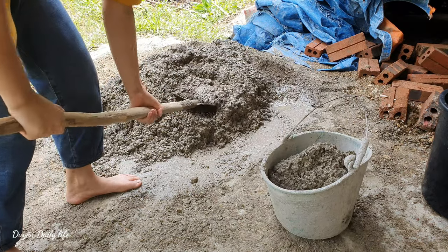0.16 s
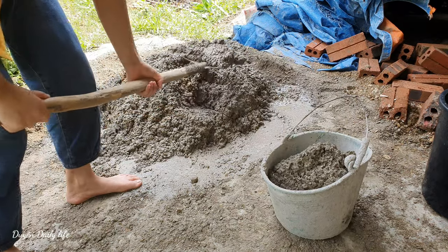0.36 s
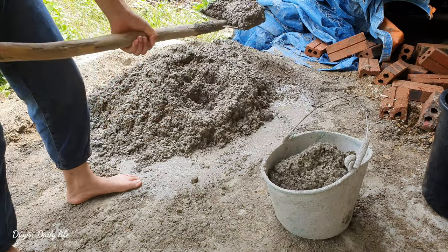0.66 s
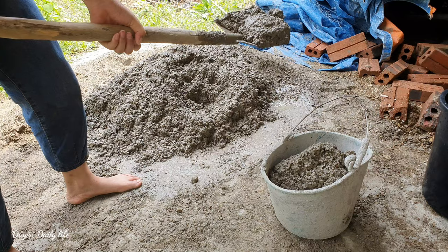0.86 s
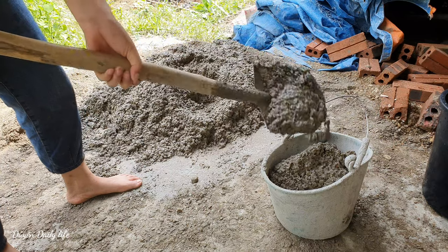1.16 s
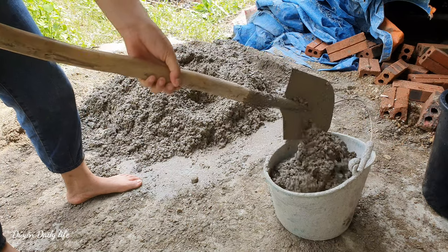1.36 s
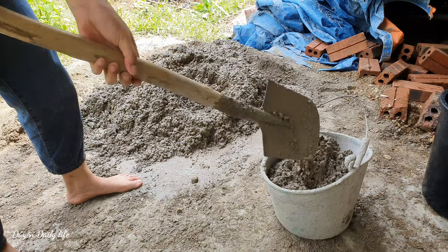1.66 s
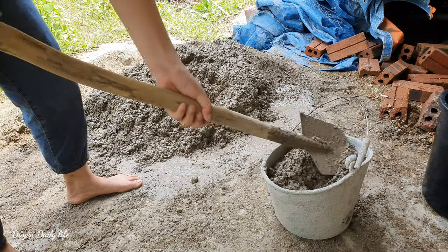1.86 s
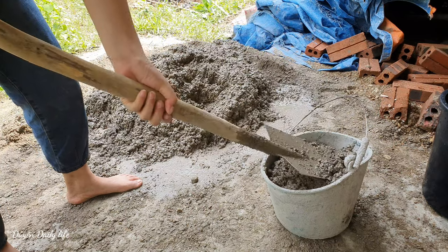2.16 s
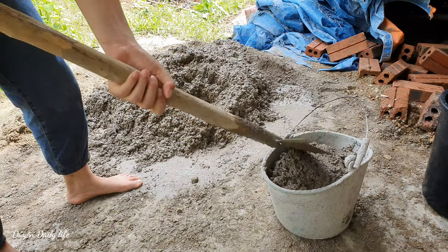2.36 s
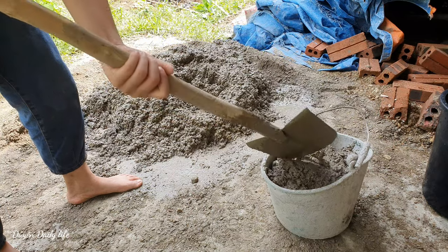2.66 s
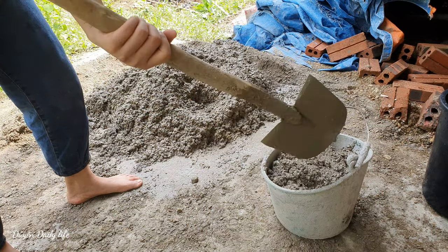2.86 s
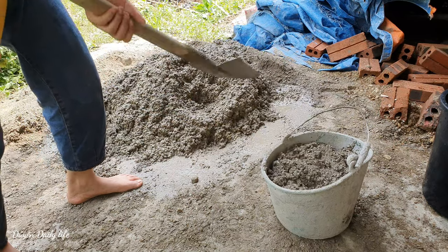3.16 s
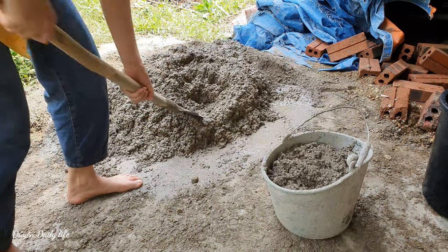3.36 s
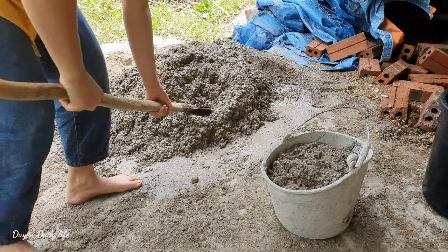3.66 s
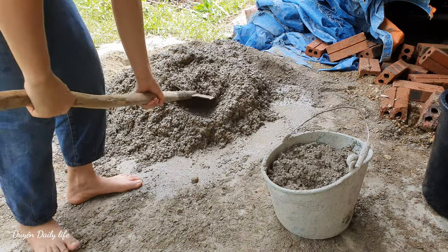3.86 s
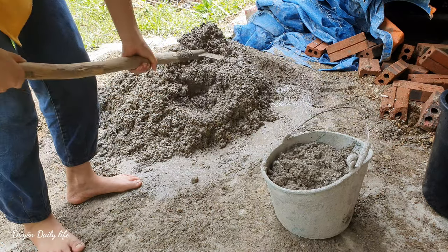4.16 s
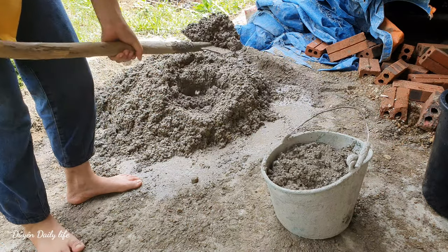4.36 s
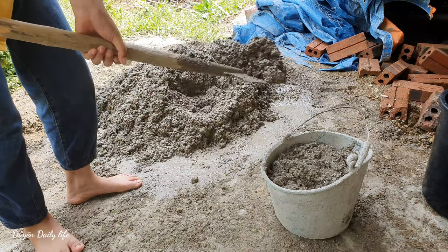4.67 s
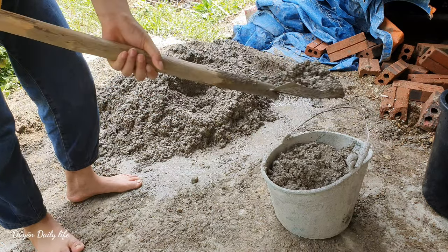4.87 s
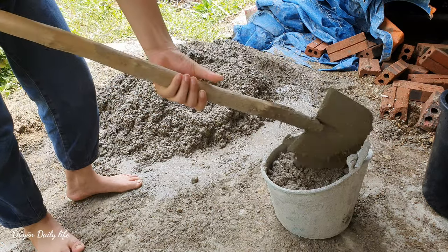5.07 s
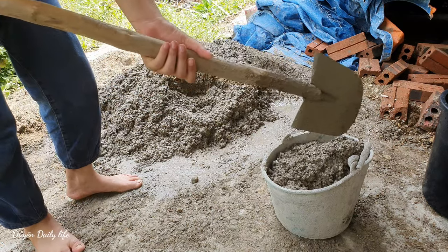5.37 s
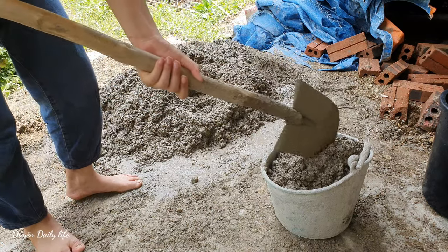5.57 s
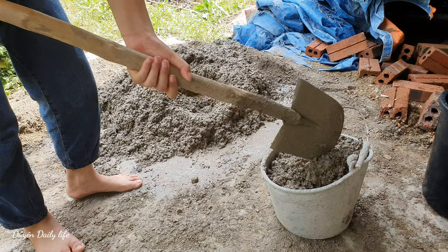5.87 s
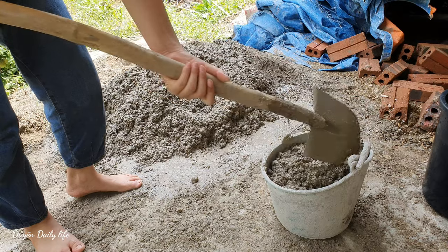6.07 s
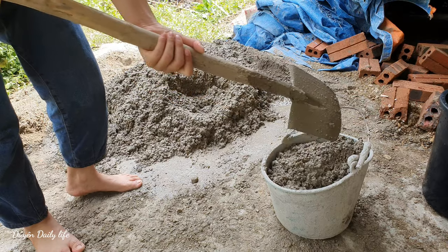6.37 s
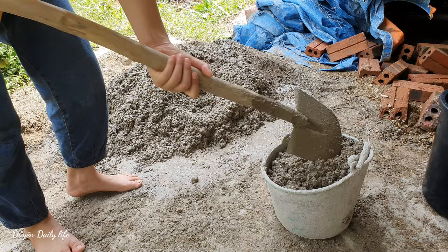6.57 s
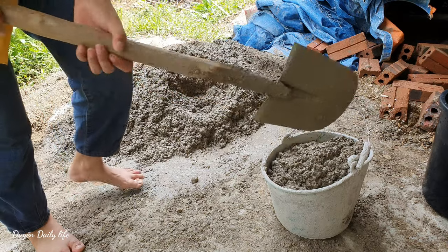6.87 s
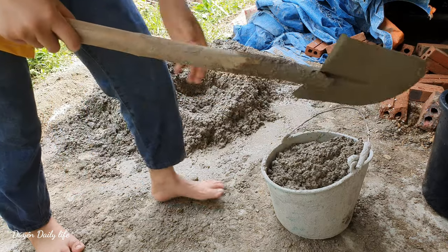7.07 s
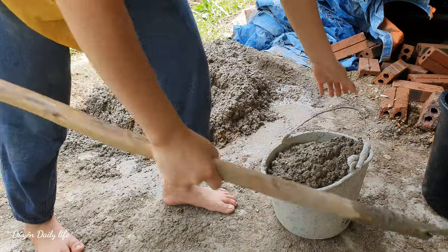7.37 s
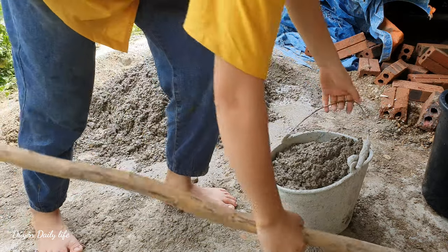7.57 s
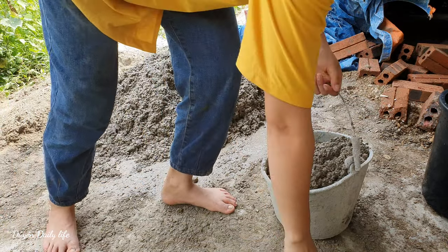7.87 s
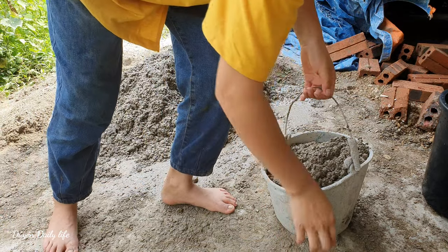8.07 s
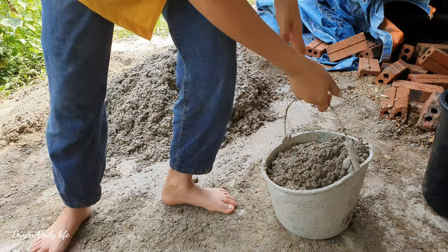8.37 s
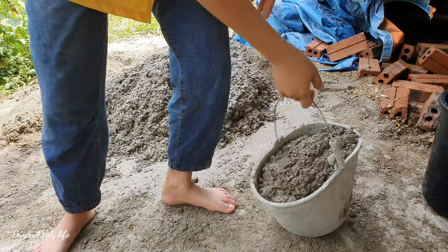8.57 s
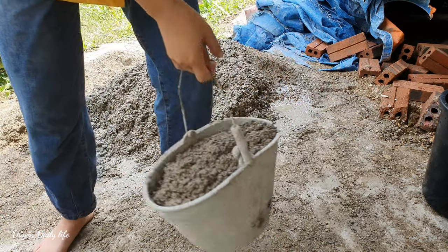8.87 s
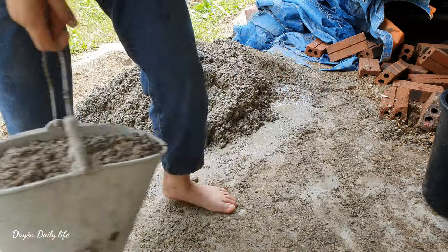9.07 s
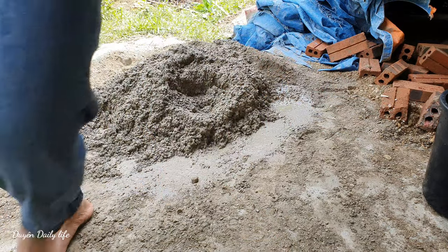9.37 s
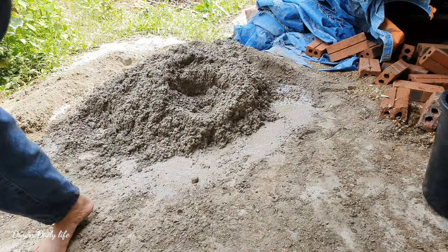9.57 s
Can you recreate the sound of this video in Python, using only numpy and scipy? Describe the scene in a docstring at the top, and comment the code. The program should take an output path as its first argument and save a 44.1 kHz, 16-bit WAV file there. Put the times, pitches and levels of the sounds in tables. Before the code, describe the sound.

A shovel scrapes gritty wet mortar into a plastic bucket, then clangs on the ground, with a faint cicada buzzing behind.

```python
"""Shovelling mortar outdoors.

Close to a stereo microphone, a steel shovel digs damp mortar from a heap, tips and pats it into a
plastic bucket and is dropped on the ground. Grit rubs along the blade, lumps knock and thud, the bare
blade clangs. Farther off, one cicada throbs over a distant chorus, leaves hiss and a far motor hums."""
import sys
import numpy as np
from scipy import signal
from scipy.fft import rfft, irfft
from scipy.io import wavfile
from scipy.ndimage import map_coordinates

SR = 44100
rng = np.random.default_rng(int(sys.argv[2]) if len(sys.argv) > 2 else 0)


def file_out(sig):
    """Save sig as 16-bit WAV at sys.argv[1]."""
    # one column per channel
    cols = np.atleast_2d(sig).T
    # limit, then scale
    lim = np.clip(cols, -1, 1)
    pcm = np.round(lim * 32767).astype(np.int16)
    wavfile.write(sys.argv[1], SR, pcm)


N = 429092

# how alike the microphone's two sides are: f/Hz, likeness/0..1
LEFT_RIGHT_LIKENESS = [(100, 0.96), (400, 0.87), (1000, 0.54), (2500, 0.19), (6000, 0.49), (15000, .1)]


def amp(db):
    return 10 ** (np.asarray(db) / 20)


def unit_rms(x):
    return x / np.sqrt(np.mean(x ** 2) + 1e-24)


def in_time(rows):
    """One curve per column after t/s, read at every sample."""
    times, *columns = np.transpose(rows)
    return [np.interp(np.arange(N) / SR, times, column) for column in columns]


def at_hz(points):
    """A spectrum table read at every FFT bin."""
    bin_hz = np.maximum(np.arange(N // 2 + 1) * SR / N, 1)
    hz, values = np.transpose(points)
    return np.interp(np.log(bin_hz), np.log(hz), values)


def colour(x, spectrum):
    """Filter by a spectrum table, then scale to unit RMS."""
    return unit_rms(irfft(rfft(x) * amp(at_hz(spectrum)), N))


def drift(rate_hz):
    """Slow random wander of unit RMS."""
    hop = 40
    pole = np.exp(-2 * np.pi * hop * rate_hz / SR)
    slow = signal.lfilter([1], [1, -2 * pole, pole * pole], rng.standard_normal(N // hop + 2002))[2000:]
    return np.interp(np.arange(N) / hop, np.arange(len(slow)), unit_rms(slow))


def resonate(x, hz, width_hz):
    """One resonance with unit gain at its peak."""
    r = np.exp(-np.pi * width_hz / SR)
    feedback = [1, -2 * r * np.cos(2 * np.pi * hz / SR), r * r]
    return signal.lfilter([(1 - r * r) / 2, 0, (r * r - 1) / 2], feedback, x)


def grains(per_s, spread_db, clump_db):
    """Uneven clicks in clumps; mid and side fire at the same moments."""
    size = amp(spread_db * np.minimum(rng.exponential(1, N), 4) + clump_db * drift(23))
    return size * (rng.random(N) < per_s / SR) * rng.standard_normal((2, N))


def burst(t60, rise_s, samples):
    """Mid and side noise under one quick rise and decay."""
    t = np.arange(samples) / SR
    return rng.standard_normal((2, samples)) * amp(-60 * t / max(t60, .004)) * np.minimum(t / rise_s, 1)


def add(out, start, sound, peak_db):
    """Mix in a sound with its mid part peaking at peak_db."""
    i = round(start * SR)
    part = sound[:, :N - i]
    out[:, i:i + part.shape[1]] += amp(peak_db) * part / np.abs(sound[0]).max()


def stereo(mid_side, likeness):
    """Mid and side become left and right, as alike as asked at each frequency."""
    alike = np.clip(likeness, 0, 1)
    mid, side = irfft(rfft(mid_side) * np.sqrt([(1 + alike) / 2, (1 - alike) / 2]), N) * np.sqrt(2)
    return np.array([mid + side, mid - side])


def open_air():
    """Distant rumble and leaf hiss all around the microphone."""
    # background spectrum: f/Hz, relative level/dB
    spectrum = [(25, -41), (60, -4.5), (120, -3), (260, -6.5), (450, -11.5), (1500, -18.5), (3200, -18.5),
                (5000, -6), (6500, -19), (11000, -21.5), (12500, -37.5), (15000, -44.5)]
    air = colour(rng.standard_normal((2, N)), spectrum)
    return stereo(air, at_hz(LEFT_RIGHT_LIKENESS) ** 3.3) * amp(-71 + drift(0.5))


def far_motor():
    """A wavering hum, far off and a little to the right."""
    hz = 199 + 2.73 * drift(3.7)
    hum = np.sin(2 * np.pi * np.cumsum(hz) / SR) * amp(-75.5 + 2.4 * drift(2.0))
    return hum * amp([[-1.4], [1.4]])


def cicadas():
    """One insect, left of centre, beats about twelve pulses a throb; the far chorus blurs into bands."""
    # swell of the insects: t/s, near level/dB, chorus level/dB
    swell = [(0, -69, -66.5), (2, -63.5, -62.5), (4, -68, -68), (6, -63.5, -63.5), (8, -67, -66.5),
             (8.6, -72, -72.5), (9.1, -70, -71), (9.73, -63, -60.5)]
    # pace of the near cicada: t/s, throbs completed
    throb_count = [(0, .58), (1.1, 9.885), (3.55, 30.52), (3.85, 32.75), (5.0, 42.54), (6.5, 55.31),
                   (7.2, 61.22), (8.0, 67.84), (9.0, 76.23), (9.73, 82.42)]
    # its resonances: f/Hz, width/Hz, relative level/dB
    near_bands = [(5523, 160, 1), (5315, 97, -4.5), (5410, 140, -11)]
    # bands of the far chorus: f/Hz, width/Hz, relative level/dB
    chorus_bands = [(4221, 100, 8), (4740, 65, 1.5), (4900, 86, 0), (7660, 300, -8.5), (11000, 900, -19.5)]
    pulses_per_s = 101.6
    near_db, chorus_db = in_time(swell)
    throb = np.clip(.9 + np.cos(2 * np.pi * in_time(throb_count)[0]), .3, 1)
    pulse_phase = (np.arange(N) * pulses_per_s / SR + 0.087 * drift(0.74)) % 1
    buzz = rng.standard_normal((2, N)) * (np.exp(-4.5 * pulse_phase) + 0.28) * throb
    near = sum(amp(db) * resonate(resonate(buzz, hz, width), hz, 3 * width)
               for hz, width, db in near_bands)
    haze = rng.standard_normal((2, N))
    chorus = sum(amp(db + 0.58 * drift(19)) * resonate(resonate(haze, hz, width), hz, 3 * width)
                 for hz, width, db in chorus_bands)
    return amp(near_db) * unit_rms(near) * amp([[1.4], [-1.4]]) + amp(chorus_db) * unit_rms(chorus)


def mortar_motion():
    """Trickle, strokes and thrown grit set the gains of crunch, grit, sand and four broad rings."""
    # loose mortar trickling and feet rustling between strokes: t/s, grit level/dB, sand level/dB
    trickle = [(0, -79, -76), (.66, -73.5, -69), (.85, -89.5, -79), (1.2, -83, -76.5), (1.8, -68, -74),
               (2.85, -83, -73), (3.0, -76.5, -73.5), (3.33, -85.5, -72.5), (3.47, -87, -80),
               (4.4, -74, -69), (4.6, -79.5, -74), (4.93, -87, -82), (5.1, -72.5, -75), (6.1, -87, -84),
               (6.9, -75, -70.5), (7.05, -75, -68), (7.2, -91.5, -83), (7.64, -81, -77), (8.35, -75, -82),
               (8.6, -87, -95), (9.05, -83.5, -95), (9.4, -79.5, -77)]
    # blade strokes through mortar: t/s, rise/s, sag/s, swell/dB, sag/dB, then crunch, grit and sand
    # level/dB at the end of the rise, then hollow, low, middle and high ring gain/dB
    strokes = [(.13, 0.14, 0.28, 3.5, 15, -69.5, -68.5, -77, 14, -15, -13, -8),
               (.69, .1, 0.0045, 6.5, -1, -76.5, -66.5, -62.5, -15, -13, -14, -6),
               (1.291, .17, 0.098, 13.5, 11, -42.5, -44, -48.5, -17, -6, -5, -22),
               (1.58, 0.032, 0.16, 8, 9, -66, -73, -68, -7, 12, 11, -11),
               (1.84, .035, 0.15, 8.5, 1, -59, -51, -51, -20, 0, -1, -1),
               (1.9, .14, 0.0039, 9.5, -1.5, -47.5, -52, -59, 0, -9, -8, -10),
               (2.117, 0.04, 0.15, 5, 3.5, -57, -52, -53.5, -33, -9, -6, -15),
               (2.51, 0.042, 0.036, -2.5, -2.5, -63, -58, -60, -15, -6, -16, -7),
               (2.625, 0.099, 0.0062, 12.5, -1, -55.5, -48.5, -53.5, 10, 8.5, -2, -18),
               (3.49, 0.026, 0.068, 9.5, 7, -42, -37, -38.5, 8, 6.5, -17, -2),
               (3.79, 0.057, 0.13, 3.5, 3.5, -68.5, -63.5, -71.5, 14.5, -23, -4, -29),
               (4.0, 0.19, 0.23, 0.5, 19, -76.5, -69.5, -71, 1, -15, -12, -12),
               (5.149, 0.082, 0.041, 17, 8.5, -52.5, -50.5, -52, -19, 1, -5, -6),
               (5.27, 0.015, 0.077, 3, -2.5, -63.5, -60, -72, -14, -8, -2, -19),
               (5.675, 0.058, 0.053, 11.5, 2.5, -58, -49, -51, -9, 4.5, 3.5, -12),
               (5.84, 0.089, 0.099, 4.5, 9, -62, -57, -57.5, -6, 2.5, 9.5, 3),
               (6.168, 0.024, .18, 2, 1.5, -64.5, -55, -56, -17, 3.5, 3.5, 3.5),
               (6.581, .17, 0.032, 9.5, 4, -58.5, -49.5, -50.5, -15.5, 3.5, -5, -10),
               (7.78, 0.019, 0.11, 19, 6, -54.5, -59, -60.5, -13, 7, 15.5, -10),
               (7.98, 0.018, 0.014, 1, -3.5, -63.5, -62.5, -78, -7, -12, -7, -13),
               (8.155, 0.0033, 0.13, -5, 2.5, -67, -69.5, -79, 4, 12.5, -9, 5),
               (9.561, 0.017, .005, 5.5, 1, -54, -48.5, -53.5, -8.5, 2, -9, -1)]
    # grit thrown up by a blow: t/s, crunch, grit and sand level/dB, grit and sand fade/(dB/s)
    scatters = [(1.255, -56.5, -60, -64, 203), (2.43, -66.5, -62.5, -80, 350), (2.604, -42, -47, -64, 495),
                (3.243, -86.5, -71, -79, 171), (4.952, -69.5, -64, -53.5, 500), (7.247, -76, -62, -81, 298),
                (7.654, -43, -37, -48, 447), (7.72, -51, -34, -44, 554), (7.765, -58.5, -39, -49, 221),
                (8.52, -58, -60, -72, 501), (9.583, -43, -35.5, -70, 480), (9.63, -65, -58, -62, 112)]
    # ringing under trickling or thrown grit: hollow, low, middle and high ring gain/dB
    loose_rings_db = (-4.5, -4, -14.5, -9)
    bite_db_per_s, lift_db_per_s, settle_db_per_s, throw_db_per_s = 1197, 503, 172, 3000
    swing = np.array([[1.49], [1], [1]])   # the crunch swells and sags further than grit and sand
    fade_share = np.array([[0.6], [1], [1]])   # and lingers after a blow
    t = np.arange(0, N / SR, .001)
    sample_t = np.arange(N) / SR
    loose_rings = amp(loose_rings_db)[:, None]

    times, grit_db, sand_db = np.transpose(trickle)
    rustle_db = np.interp(t, times, grit_db) + 4 * np.interp(t, sample_t, drift(15))
    power = amp([rustle_db - 8, rustle_db, np.interp(t, times, sand_db)]) ** 2   # crunch, grit, sand
    rings = power[1] * loose_rings
    for start, rise, sag, swell_db, sag_db, *db in strokes:
        levels_db, rings_db = np.array(db[:3])[:, None], np.array(db[3:])[:, None]
        body_db = np.interp(t - start, [0, rise, rise + sag], [-swell_db, 0, -sag_db])
        bite_db = bite_db_per_s * np.maximum(start - t, 0)
        after = np.maximum(t - start - rise - sag, 0)
        # the blade lifts quickly, then the mortar settles slowly
        release_db = np.minimum(lift_db_per_s * after, 11.5 + settle_db_per_s * after)
        stroke = amp(levels_db + swing * body_db - bite_db - release_db) ** 2
        power += stroke
        rings += stroke[1] * amp(rings_db)
    for start, *db, fade_db_per_s in scatters:
        onset_db = throw_db_per_s * np.maximum(start - t, 0)
        fade_db = fade_db_per_s * np.maximum(t - start, 0) * fade_share
        scatter = amp(np.array(db)[:, None] - fade_db - onset_db) ** 2
        power += scatter
        rings += scatter[1] * loose_rings
    ring_gains = rings / power[1]   # each event counts by its share of the grit power
    return [np.interp(sample_t, t, gain) for gain in (*np.sqrt(power), *ring_gains)]


def pebbles(per_s, cycles):
    """Each stone click rings a few cycles at one of ten pitches."""
    clicks = grains(per_s, spread_db=2.5, clump_db=-1.5)
    pitch_index = rng.integers(0, 10, N)
    return sum(resonate(clicks * (pitch_index == k) + 1e-18, hz, 2.2 * hz / cycles)
               for k, hz in enumerate(np.geomspace(520, 1700, 10)))


def rubbing():
    """Stones crunch, grit scrapes, sand hisses; the blade rings along where the mortar lets it."""
    # spectra of stones, grit and sand on the blade: f/Hz, relative level/dB
    crunch_spectrum = [(50, -52.5), (120, -2), (380, -13), (520, 1), (800, 3), (1400, 5), (1900, 5),
                       (4000, -35.5)]
    grit_spectrum = [(900, -17.5), (1700, -7), (2200, 0), (3500, -1.5), (4500, -4.5), (6000, -29.5),
                     (9000, -41)]
    sand_spectrum = [(2500, -21.5), (5000, 0), (7000, -4), (10500, -6), (12500, -11), (15000, -14)]
    # broad rings of the hollow in the heap and the coated blade (low pair, middle, high): f/Hz, width/Hz
    rings = [(500, 110), (740, 70), (1030, 90), (2100, 110), (3500, 160)]
    crunch, grit, sand, hollow, low, middle, high = mortar_motion()
    stones = unit_rms(pebbles(2500, cycles=9.4))
    stones += 3.2 * unit_rms(grains(3000, spread_db=2.5, clump_db=-4.0))
    scrape = crunch * colour(stones, crunch_spectrum)
    scrape += grit * colour(grains(6000, spread_db=-1.0, clump_db=0.0), grit_spectrum)
    ringing = sum(gain * resonate(scrape, hz, width)
                  for (hz, width), gain in zip(rings, (hollow, low, low, middle, high)))
    hiss = sand * colour(grains(12000, spread_db=-0.5, clump_db=-0.85), sand_spectrum)
    return scrape + ringing + hiss


def thuds():
    """Ground and bucket answer a soft landing with a low puff."""
    # soft heavy landings: t/s, peak level/dB, f/Hz, t60/s
    landings = [(.302, -54, 290, 0.074), (0.298, -60.5, 60, 0.12), (2.012, -45, 147, 0.021),
                (2.017, -47.5, 66, 0.17), (2.598, -41.5, 157, 0.09), (2.696, -45.5, 203, 0.17),
                (3.133, -55, 108, 0.056), (3.51, -53, 67, 0.46), (4.946, -67.5, 150, .08),
                (5.2, -54, 115, 0.16), (7.65, -41.5, 240, 0.11), (7.71, -49, 110, 0.051),
                (8.012, -59.5, 190, 0.067), (8.149, -56, 150, 0.24), (8.197, -50.5, 146, 0.42),
                (8.519, -53.5, 236, 0.1), (9.584, -46, 91, 0.61), (9.599, -38.5, 196, 0.23)]
    out = np.zeros((2, N))
    for start, db, hz, t60 in landings:
        puff = resonate(burst(t60, 0.0026, samples=16000), hz, 0.4 * hz)
        add(out, start, resonate(puff, hz, 4.4 * hz), db)
    return out


def knocks():
    """A sharp contact and a short crush ring the lump at its pitch, with a dry crack on top."""
    # lumps, stones and the wire handle knocking: t/s, peak level/dB, f/Hz, crack re peak/dB
    hits = [(1.251, -48, 720, -36), (1.262, -43, 705, -30), (1.419, -32.5, 1490, -28),
            (1.44, -46, 1440, -30), (1.463, -29, 1540, -33), (1.531, -40.5, 1470, -42),
            (1.584, -49, 1060, -25), (1.767, -54, 730, -21), (2.014, -25.5, 1040, -34),
            (2.424, -55.5, 636, -22), (2.504, -50, 1370, -14), (2.598, -27, 1020, -41),
            (2.685, -30, 1320, -25), (2.701, -24, 1180, -15), (2.708, -26, 1290, -12),
            (3.237, -44, 1120, -32), (4.947, -51.5, 3160, 5), (5.294, -36.5, 1430, -35),
            (5.333, -43.5, 1580, -32), (5.352, -40.5, 1400, -34), (7.983, -48, 1550, -26),
            (7.993, -50, 1800, -24), (8.012, -51, 3190, -31), (8.068, -52, 3730, -27),
            (8.087, -45, 3050, -30), (8.148, -45, 1160, -19), (8.173, -50.5, 3640, -26),
            (8.239, -53, 3530, -31), (8.526, -40.5, 1360, -32), (9.56, -34.5, 3410, -20),
            (9.647, -40, 2300, -13)]
    t60 = 0.078
    out = np.zeros((2, N))
    for start, db, hz, crack_db in hits:
        crush = burst(t60, 0.00027, samples=8000)
        contact = burst(0.0055, 0.00014, samples=8000)
        force = crush + 1.7 * contact
        ring = resonate(force, hz, 0.19 * hz) + 0.15 * resonate(force, 2.4 * hz, 0.41 * hz)
        add(out, start, ring, db)
        crack = np.diff(burst(t60, .0003, samples=8000))
        add(out, start, crack, db + crack_db)
    return out


def clangs():
    """Each blow chokes the last ring and starts the blade's modes anew; glancing blows ring brighter."""
    # the bare blade striking the ground: t/s, peak level/dB, damping factor, tilt/(dB/octave),
    # edge mode gain/dB, bowl mode gain/dB, crack re peak/dB
    blows = [(7.648, -22.5, 1.7, -1.5, -31, 2, 1.5), (7.713, -22.5, 0.65, 1, -0.5, -10, -2.5),
             (7.753, -23.5, 1.0, 6.5, 2, -3, -3.5), (7.796, -32.5, 1.4, 0.5, 0, 14, -12),
             (7.844, -40, 1.3, 1, -27, 7, 5.5), (7.929, -47.5, 1.2, -0.5, -8, 15, -6),
             (8.198, -52, 1, -8, -15, 19, -14), (9.579, -20, 2.3, -4, -8, 3.5, -22),
             (9.645, -35.5, 1.1, -5.5, -19, 2, -11)]
    # modes of the bare steel blade: f/Hz, level/dB, t60/s at damping factor 1
    modes = [(340, -25, .3), (648, -18, .35), (856, -16, .25), (990, -6, .1), (1055, -14, .4),
             (1310, -16, .35), (2050, -8, .22), (2196, -18, .25), (2347, -17, .2), (2713, 1, .24),
             (2794, -12, .2), (3350, -9, .17), (3405, -11, .15), (3710, -14, .1), (4091, -20, .15),
             (4680, -9, .07), (4931, -17, .2), (6212, -28, .15), (7500, -22, .05)]
    out = np.zeros((2, N))
    t = np.arange(SR // 2) / SR
    hz, mode_db, t60 = np.transpose(modes)[:, :, None, None]
    edge = (hz > 2600) & (hz < 2900)   # the cutting edge's modes, muted when it lands on the ground
    bowl = hz == 1055   # the blade's bowl rings on as it rocks
    side_lag = np.array([[0], [.25]])   # side trails mid by a quarter cycle
    attack = np.minimum(t / .001, 1)
    gaps = np.diff([blow[0] for blow in blows] + [N / SR])
    for (start, db, damping, tilt_db, edge_db, bowl_db, crack_db), gap in zip(blows, gaps):
        weakness, phase = rng.random((2, len(modes), 1, 1))
        struck_db = mode_db + tilt_db * np.log2(hz / 2000) + edge_db * edge + bowl_db * bowl
        decay = amp(struck_db - 3 * weakness - 60 * t * damping / t60)
        ring = np.sum(decay * np.sin(2 * np.pi * (hz * t + phase - side_lag)), axis=0)
        choke = np.clip((gap - t) / .006, .15, 1)
        add(out, start, ring * attack * choke, db)
        crack = resonate(burst(0.034, 0.00078, samples=6000), 2800, 3800)
        add(out, start, crack, db + crack_db)
    return out


def at_microphone(work):
    """As the work moves about, it reaches the microphone's two sides at shifting delays and levels."""
    # place of the work: t/s, left delay/ms, left re right level/dB
    path = [(0, -0.071, -0.5), (1.1, 0.11, -0.5), (3.3, 0.063, -1.5), (3.45, -0.053, 0),
            (4.6, -0.056, -0.5), (5.1, 0.11, -0.5), (7.0, 0.066, -0.5), (7.6, 0.21, -0.5),
            (8.3, 0.19, -2.5), (8.5, 0.1, -2), (9.3, 0.16, -1)]
    delay_ms, pan_db = in_time(path)
    left, right = stereo(work, at_hz(LEFT_RIGHT_LIKENESS))
    left = map_coordinates(left, [np.arange(N) - delay_ms * SR / 1000], order=3, mode="nearest")
    return np.array([left * amp(pan_db / 2), right * amp(-pan_db / 2)])


def scene():
    """The shovel up close, with insects, air and motor behind it."""
    work = rubbing() + knocks() + clangs() + thuds()
    return at_microphone(work) + cicadas() + open_air() + far_motor()


def record(dry):
    """A steep low-pass cuts the highest treble."""
    stopband_hz = 16224
    return signal.sosfilt(signal.cheby2(12, 60, stopband_hz, fs=SR, output="sos"), dry)


dry = scene()
out = record(dry)
file_out(out)
```